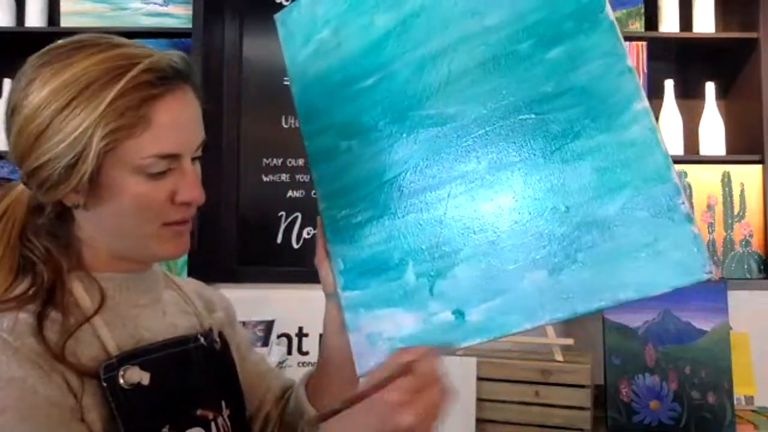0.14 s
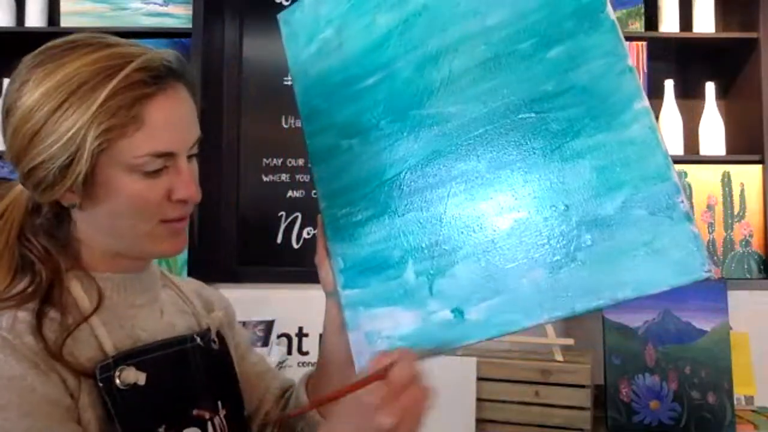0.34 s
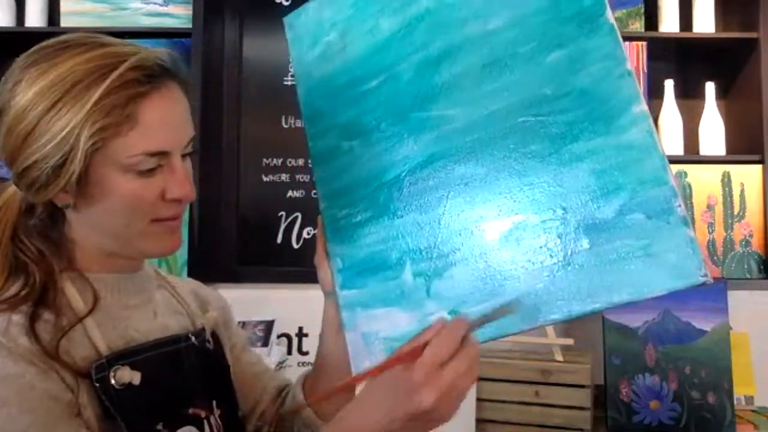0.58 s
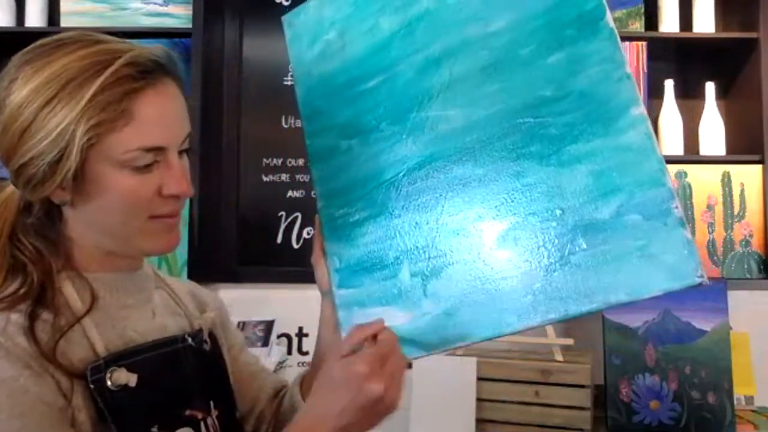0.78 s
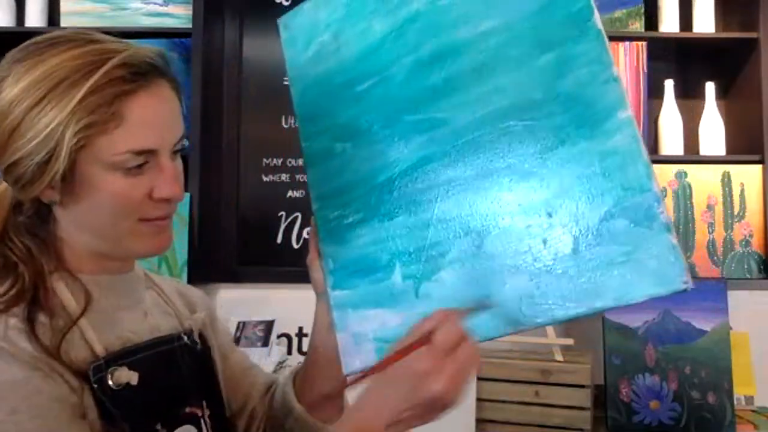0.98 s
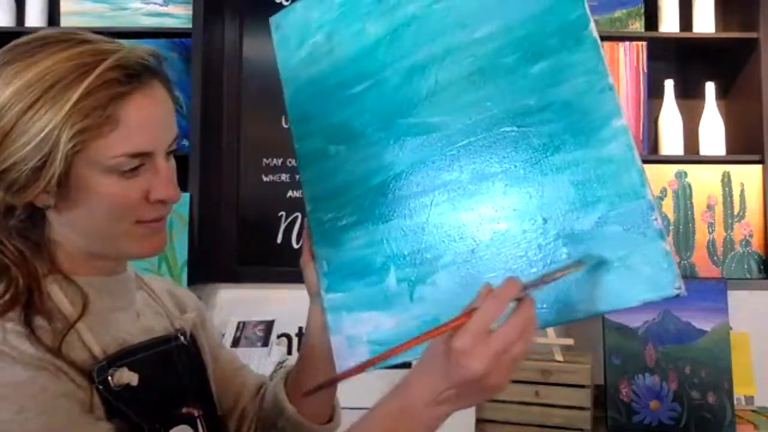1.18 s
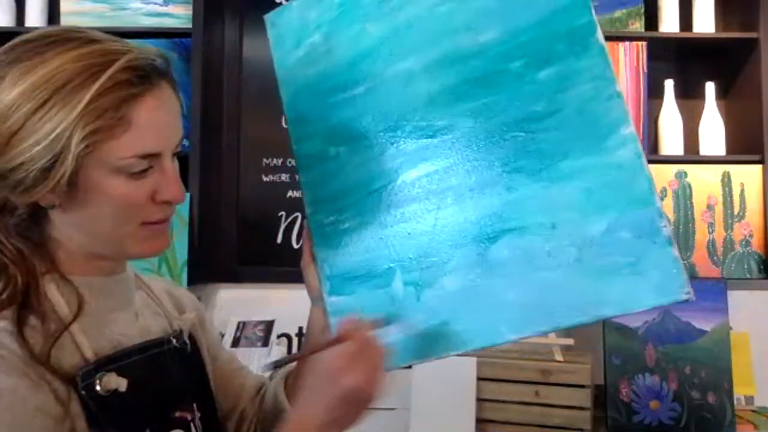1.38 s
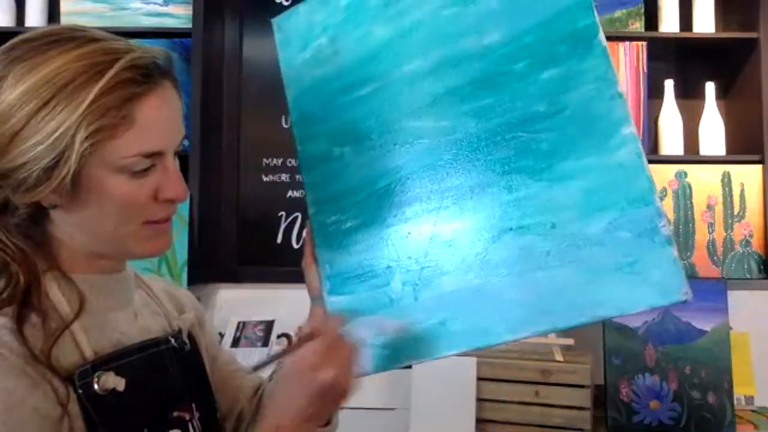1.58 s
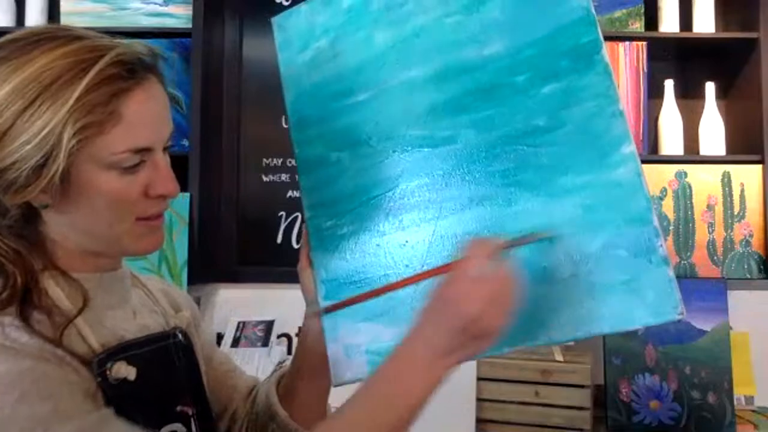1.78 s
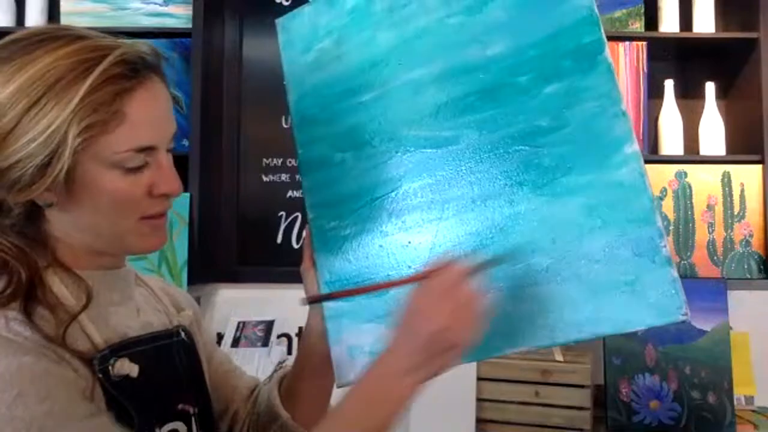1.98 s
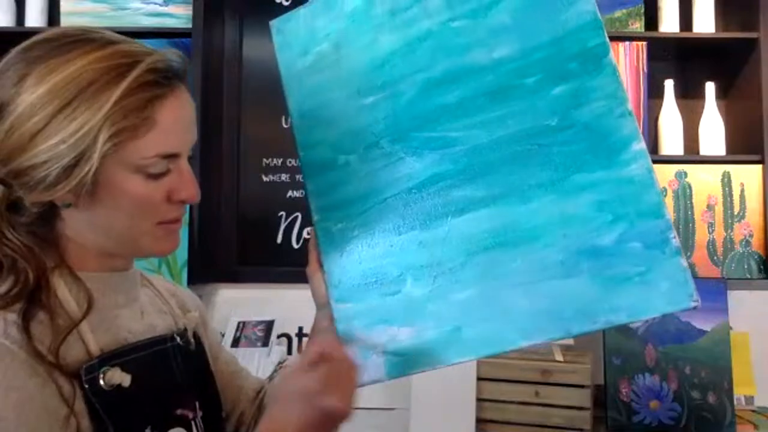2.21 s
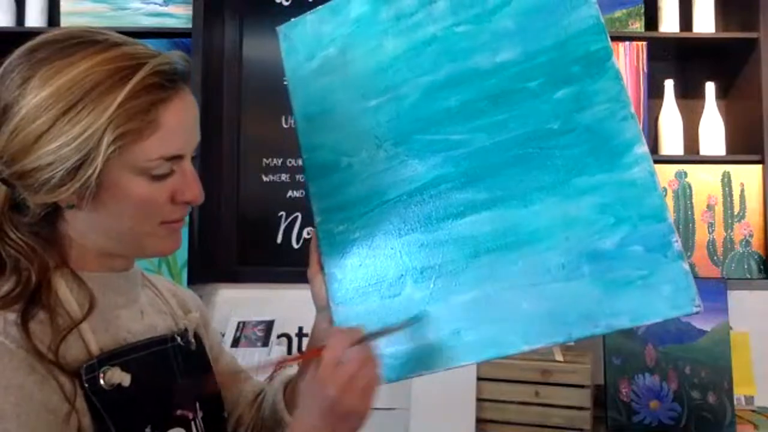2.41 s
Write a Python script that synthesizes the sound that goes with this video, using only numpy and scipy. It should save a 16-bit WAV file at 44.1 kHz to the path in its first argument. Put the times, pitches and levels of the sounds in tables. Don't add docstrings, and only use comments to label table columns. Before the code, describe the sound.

A stiff paintbrush scrubs a stretched canvas in quick, dry, hissing strokes in a quiet room

```python
import sys
import numpy as np
from scipy import signal
from scipy.fft import rfft, irfft
from scipy.io import wavfile
from scipy.ndimage import uniform_filter1d

SR = 44100
rng = np.random.default_rng(int(sys.argv[2]) if len(sys.argv) > 2 else 0)


def magnitude_from_level(level_db):
    exponent = np.asarray(level_db, float) / 20
    return 10 ** exponent


def dump_mix(stems):
    frames = np.atleast_2d(stems).T
    limited = np.clip(frames, -1, 1)
    pcm = np.round(limited * 32767).astype(np.int16)
    wavfile.write(sys.argv[1], SR, pcm)


N = 108045

PATCH_DB = 3
CLUMP_DB = 3.5
RAGGED_SHARE = .45
MEAN_HISS_DB = -52


def rms_one(x):
    return x / np.sqrt(np.mean(x ** 2) + 1e-20)


def colour(x, points):
    hz, db = np.transpose(points)
    log_hz = np.log(np.arange(N // 2 + 1) * SR / N + 1)
    gain_db = np.interp(log_hz, np.log(hz), db, left=-80, right=-80)
    return rms_one(irfft(rfft(x) * magnitude_from_level(gain_db), N))


def resonance(x, hz, width_hz):
    r = np.exp(-np.pi * width_hz / SR)
    return rms_one(signal.lfilter([1, 0, -1], [1, -2 * r * np.cos(2 * np.pi * hz / SR), r * r], x))


def steep_band(x, hz, width_hz):
    return resonance(resonance(x, hz, width_hz), hz, width_hz)


def drift(rate, count):
    r = np.exp(-2 * np.pi * rate / SR)
    settle = SR // 12
    wander = signal.lfilter([1], [1, -2 * r, r * r], rng.standard_normal(count + settle))
    return rms_one(wander[settle:])


def patchy(x, points, patch_db):
    spectrum = rfft(colour(x, points))
    hz = np.arange(N // 2 + 1) * SR / N
    low, high = points[0][0], points[-1][0]
    edges = low * 2 ** np.arange(0, np.log2(high / low) + 1 / 6, 1 / 6)
    flicker = [np.roll(magnitude_from_level(patch_db * drift(14.4, count=N)), k * N // 7) for k in range(7)]
    out = np.zeros(N)
    for k, (a, b) in enumerate(zip(edges, edges[1:])):
        band = irfft(spectrum * (hz >= a) * (hz < b), N)
        out += np.roll(flicker[k % 7], k * N // 61) * band
    return rms_one(out)


def ticks(count=N):
    ticks_per_s, spread_db, smooth_share = 14000, 2.5, 0.59
    sizes = magnitude_from_level(spread_db * np.minimum(rng.exponential(1, count), 5)) * rng.choice([-1, 1], count)
    clicks = rms_one(sizes * (rng.random(count) < ticks_per_s / SR))
    return (1 - smooth_share) * clicks + smooth_share * rng.standard_normal(count)


def swells(rows, voice, clump_db):
    rise_share, clumps_per_s = 0.32, 58.6
    out = np.zeros(N)
    for s, length, hz, db in rows:
        drive = ticks(count=SR // 3) * magnitude_from_level(clump_db * drift(clumps_per_s, count=SR // 3))
        start = max(int(s * SR) - SR // 7, 0)
        t = np.arange(start, min(start + SR // 3, N))
        spread = length * np.where(t / SR < s, rise_share, .8 - rise_share)
        shape = np.exp(-.5 * ((t / SR - s) / spread) ** 2)
        out[t] += magnitude_from_level(db) * shape * voice(drive, hz)[:len(t)]
    return out


def room():
    # (frequency [Hz], density [dB per Hz])
    room_tone = [(20, -41.5), (110, -5.5), (240, -2), (500, -17), (1000, -19), (4000, -21.5), (7500, -27),
                 (10500, -20.5)]
    room_top = (15800, -23)
    mains = resonance(rng.standard_normal(N), 119.6, 6.0)
    air = patchy(rng.standard_normal(N), room_tone + [room_top], 2.5)
    return magnitude_from_level(-81) * air + magnitude_from_level(-88) * mains


def speed_db(t, added=np.zeros(14)):
    # (time [s], hiss level [dB])
    early_strokes = [
        [(0, -85), (.03, -51.5), (.068, -47.5), (.09, -63.5), (.135, -91)],
        [(.15, -81), (.19, -50.5), (.23, -41), (.255, -44.5), (.32, -86)],
        [(.345, -86), (.366, -43), (.39, -34), (.432, -33.5), (.45, -50), (.51, -83)],
        [(.51, -86), (.535, -57.5), (.59, -53.5), (.612, -50.5), (.635, -60), (.665, -89)],
        [(.74, -84.5), (.77, -61), (.8, -72.5), (.87, -90)],
        [(.89, -91), (.925, -54.5), (.98, -53), (1.06, -48), (1.1, -57)],
        [(1.09, -56.5), (1.132, -52.5), (1.15, -59), (1.19, -76.5), (1.23, -95)],
    ]
    # (time [s], hiss level [dB])
    late_strokes = [
        [(1.245, -88), (1.28, -53.5), (1.33, -48), (1.352, -56), (1.39, -65)],
        [(1.39, -65.5), (1.43, -55.5), (1.47, -46.5), (1.51, -48.5), (1.58, -86)],
        [(1.6, -86), (1.65, -64.5), (1.69, -57.5), (1.73, -59)],
        [(1.73, -54.5), (1.77, -48), (1.79, -54.5), (1.815, -65.5), (1.89, -75.5), (1.93, -95)],
        [(1.97, -93), (1.99, -60.5), (2.01, -49), (2.06, -53), (2.12, -63)],
        [(2.11, -61.5), (2.13, -55), (2.165, -43.5), (2.195, -52), (2.215, -64.5), (2.26, -85.5)],
        [(2.32, -80), (2.35, -51), (2.392, -52.5), (2.415, -69), (2.45, -84)],
    ]
    strokes = zip(early_strokes + late_strokes, added)
    levels = [np.interp(t, *np.transpose(s), left=-130, right=-130) + db for s, db in strokes]
    return np.max(levels, axis=0)


def framed(added=np.zeros(14), creep=0.41, ragged=0.):
    step_s, first_s, edge_s = .02, .001, .002
    t = np.arange(N) / SR
    frame = np.floor((t - first_s) / step_s).astype(int) + 1
    centres = first_s + (np.arange(frame[-1] + 1) - .5) * step_s
    levels = speed_db(centres, added)
    change = np.minimum(np.abs(np.gradient(levels)), 20)
    half = np.floor((t - first_s) / step_s * 2).astype(int) + 2
    scatter = ragged * change[frame] * rng.uniform(-1.5, .5, half[-1] + 1)[half]
    held = uniform_filter1d(levels[frame] + scatter, int(edge_s * SR))
    return held + creep * np.minimum(speed_db(t, added) - held, 0)


def ragged_tips():
    # (frequency [Hz], density [dB per Hz])
    tips_colour = [(11900, -30), (12020, 0), (13350, 0), (13450, -40)]
    # (frequency [Hz], density [dB per Hz])
    fine_colour = [(13350, -40), (13450, 0), (15720, 0), (15850, -60)]
    fine = rfft(colour(ticks(), fine_colour))
    band = np.digitize(np.arange(len(fine)) * SR / N, [14200, 15000])
    out = magnitude_from_level(-3 + framed(ragged=RAGGED_SHARE)) * colour(ticks(), tips_colour)
    for k in range(3):
        fine_db = -1.5 + framed(creep=.9, ragged=RAGGED_SHARE)
        out = out + magnitude_from_level(fine_db) * irfft(fine * (band == k), N)
    return out


def hiss():
    # (added to shafts [dB], added to weave [dB])
    pressure = [(-1, -1.5), (0.5, -6), (5.5, -15.5), (1, 6.5), (3, 4), (-0.5, -0.5), (-2.5, 2), (4.5, 8),
                (2.5, 10.5), (2, 11.5), (0, 8.5), (0, 6.5), (3, 12), (0, 0.5)]
    # (frequency [Hz], density [dB per Hz])
    shafts_colour = [(10200, -22), (10650, -4), (11000, 1), (11800, -5), (12050, -30)]
    # (frequency [Hz], density [dB per Hz])
    roots_colour = [(7900, -35), (8200, -9), (9000, -4), (10300, 0), (10700, -16)]
    # (frequency [Hz], density [dB per Hz])
    weave_colour = [(400, -9.5), (900, -7), (1600, -4), (2500, -4), (3600, -3.5), (5500, -2), (7000, -8),
                    (8100, -16)]
    weave_lag_s = 0.013
    shafts_added, weave_added = np.transpose(pressure)
    shafts_swing = framed(shafts_added, creep=.6, ragged=RAGGED_SHARE) - MEAN_HISS_DB
    shafts_db = MEAN_HISS_DB - 14 + 1.03 * shafts_swing
    roots_swing = framed(shafts_added, creep=.5, ragged=.3) - MEAN_HISS_DB
    roots_db = MEAN_HISS_DB - 22 + .95 * roots_swing
    weave_swing = speed_db(np.arange(N) / SR - weave_lag_s, weave_added) - MEAN_HISS_DB
    weave_db = uniform_filter1d(MEAN_HISS_DB - 26.5 + 0.78 * weave_swing, SR // 100)
    shafts = magnitude_from_level(shafts_db) * patchy(ticks(), shafts_colour, PATCH_DB)
    roots = magnitude_from_level(roots_db) * patchy(ticks(), roots_colour, PATCH_DB)
    weave = magnitude_from_level(weave_db) * patchy(ticks(), weave_colour, 2.5)
    return ragged_tips() + shafts + roots + weave


def hum(drive, hz):
    width_hz = 28
    mode = resonance(resonance(drive, hz, width_hz), hz, 2.32 * width_hz)
    mode = rms_one(mode / (uniform_filter1d(mode ** 2, SR // 50) + .05) ** .3)
    return mode + magnitude_from_level(-9) * steep_band(drive, hz, 130)


def hums():
    # (centre [s], length [s], frequency [Hz], level [dB])
    hum_rows = [(.05, 0.091, 244, -76), (.24, 0.094, 235, -81.5), (.55, 0.051, 199, -78),
                (.75, 0.089, 247, -81), (1.03, 0.06, 238, -76.5), (1.11, 0.093, 191, -72),
                (1.21, .13, 194, -67.5), (1.17, 0.12, 1049, -91), (.44, .05, 125, -80),
                (.58, .07, 118, -81), (1.78, .05, 125, -80), (2.03, .08, 115, -79), (1.35, .07, 310, -69),
                (1.43, .09, 335, -68.5), (1.55, 0.094, 201.4, -78.5), (1.75, .12, 250, -76),
                (1.85, 0.075, 207, -77), (2.03, 0.062, 302, -72), (2.12, 0.035, 330, -74),
                (2.155, 0.035, 420, -75), (2.2, .06, 217, -74), (2.42, 0.1, 197, -79.5),
                (.34, 0.059, 1072, -88), (.275, .04, 1400, -85)]
    return swells(hum_rows, hum, 1.2)


def whistle(drive, hz):
    return steep_band(drive, hz, hz / 22)


def whistles():
    # (centre [s], length [s], frequency [Hz], level [dB])
    whistle_rows = [(.4, .03, 3610, -58), (.06, .02, 11580, -52), (.545, 0.032, 11000, -69),
                    (.6, 0.045, 10830, -65), (.93, 0.039, 10840, -59), (1.0, .05, 11100, -64),
                    (1.07, 0.043, 10750, -62.5), (1.29, 0.013, 10800, -55.5), (1.335, 0.016, 10860, -56),
                    (1.44, 0.035, 11200, -63), (1.735, 0.032, 11100, -78), (2.155, .02, 9400, -59.5),
                    (2.37, 0.053, 11300, -60.5)]
    return swells(whistle_rows, whistle, CLUMP_DB)


def squeal(drive, hz):
    return steep_band(drive, hz, hz / 12.6) + magnitude_from_level(-8.5) * steep_band(drive, hz, hz / 3.44)


def squeals():
    # (centre [s], length [s], frequency [Hz], level [dB])
    squeal_rows = [(0.072, .035, 3680, -72.5), (0.227, 0.049, 4600, -76.5), (0.065, .05, 5400, -83),
                   (0.597, 0.045, 3150, -72), (.763, 0.012, 4280, -70), (.945, 0.057, 3700, -87),
                   (1.02, .04, 2950, -74.5), (1.08, 0.084, 2740, -79), (0.91, 0.053, 4900, -88.5),
                   (1.335, .04, 2946, -59.5), (1.325, 0.014, 5720, -56), (1.33, 0.048, 1410, -78),
                   (1.4833, 0.06, 3750, -56.5), (1.475, 0.031, 1650, -63), (1.495, .03, 5400, -70),
                   (1.73, 0.05, 1660, -82), (1.78, 0.033, 4140, -75), (2.02, 0.042, 5330, -71.5),
                   (2.045, 0.035, 2860, -77), (2.05, 0.031, 1800, -74.5), (2.17, 0.054, 3523, -55),
                   (2.17, 0.05, 4340, -59), (2.17, 0.058, 2870, -63), (2.165, .04, 1740, -68),
                   (2.11, .05, 3450, -74.5), (2.07, .05, 3150, -77), (2.19, .04, 2150, -70),
                   (2.36, .06, 5400, -79), (2.343, .012, 4200, -80), (2.355, .04, 3100, -83),
                   (1.68, .06, 5400, -82), (1.03, .06, 6000, -78), (1.12, .05, 5500, -80),
                   (.605, .04, 3800, -76)]
    return swells(squeal_rows, squeal, CLUMP_DB)


def touches():
    # (time [s], level [dB])
    landings = [
        (.066, -48),
        (.366, -41),
        (.53, -60),
        (.901, -61),
        (.912, -58),
        (1.27, -60),
        (1.621, -66),
        (1.682, -55),
        (1.989, -62),
        (2.341, -60),
    ]
    fade_s = .003
    t = np.arange(N) / SR
    shape = sum(magnitude_from_level(db) * (t > s) * np.exp(-np.maximum(t - s, 0) / fade_s) for s, db in landings)
    puff_colour = [(8000, -30), (9500, -12), (12500, 0), (14000, -5), (15500, -8)]
    puff = colour(rng.standard_normal(N), puff_colour)
    return uniform_filter1d(shape, SR // 1000) * puff


def rub(drive, hz):
    return steep_band(drive, hz, hz / 3.0)


def rubs():
    # (centre [s], length [s], frequency [Hz], level [dB])
    rub_rows = [(.57, .11, 370, -79), (1.06, .08, 600, -81), (2.09, .06, 480, -77), (1.6, .07, 650, -86),
                (.585, .05, 2100, -79), (1.74, .08, 1700, -76), (1.86, .08, 2600, -84),
                (1.63, .07, 3500, -87), (1.76, .07, 3000, -76), (2.155, .03, 950, -76),
                (.23, .07, 3300, -80), (1.75, .1, 330, -77)]
    return swells(rub_rows, rub, 2.5)


def swipe():
    # (frequency [Hz], density [dB per Hz])
    tuft_colour = [(3300, -41), (3550, -7), (4150, -17), (4700, 2), (7000, -6.5), (7900, -10.5), (9000, 2),
                   (10500, -3.5)]
    start_s, end_s, hold_s = 0.3836, 0.4395, .015
    t = np.arange(N) / SR - start_s
    sag = 349.5 * np.maximum(t - hold_s, 0)
    onset = np.minimum(3000 * t, 0)
    stop = 420 * np.maximum(t + start_s - end_s, 0)
    return magnitude_from_level(-42 - sag + onset - stop) * patchy(ticks(), tuft_colour, PATCH_DB)


def scene():
    tones = hums() + whistles() + squeals() + rubs()
    return (room() + hiss() + touches() + swipe() + tones)[None]


def low_pass(x):
    return signal.sosfilt(signal.butter(12, 15950, fs=SR, output="sos"), x)


def record(dry):
    return low_pass(dry)


dry = scene()
out = record(dry)
dump_mix(out)
```